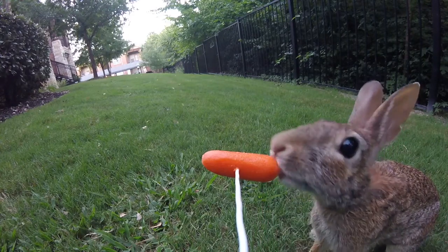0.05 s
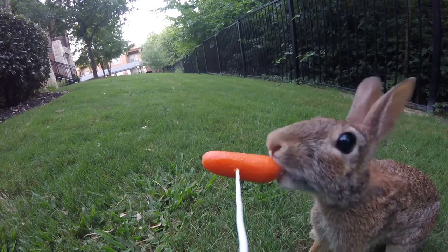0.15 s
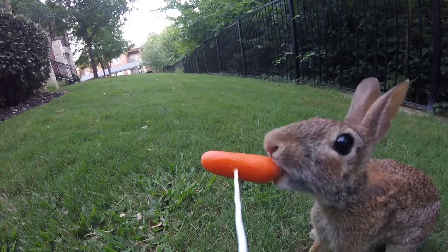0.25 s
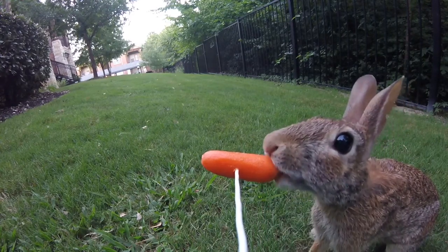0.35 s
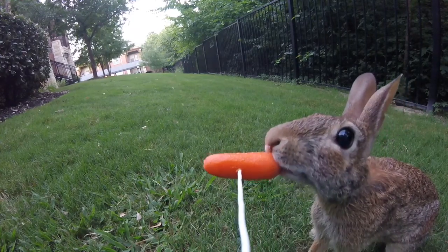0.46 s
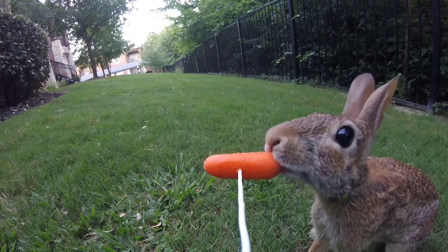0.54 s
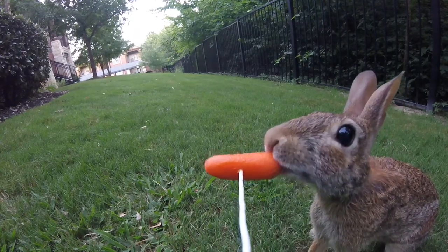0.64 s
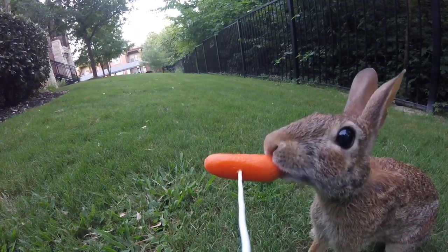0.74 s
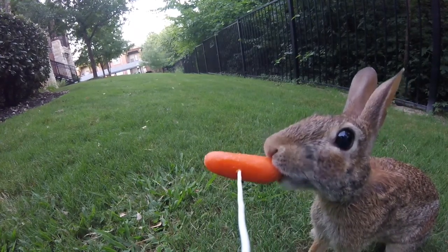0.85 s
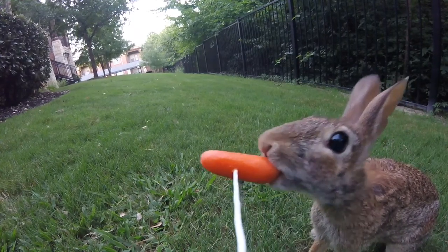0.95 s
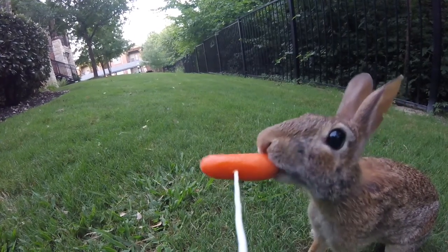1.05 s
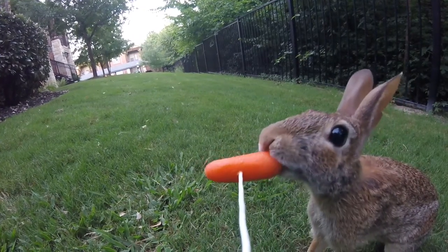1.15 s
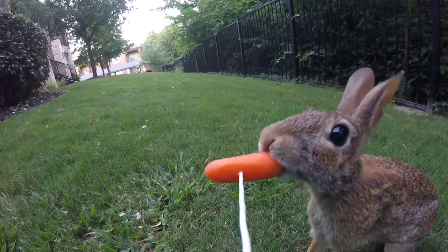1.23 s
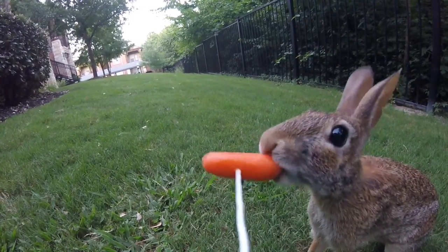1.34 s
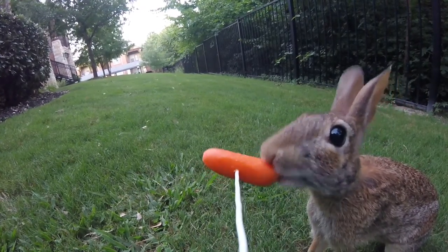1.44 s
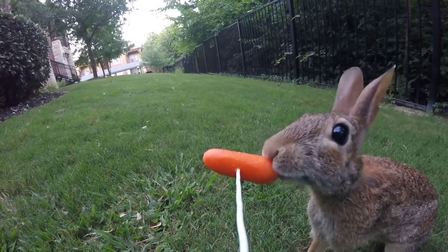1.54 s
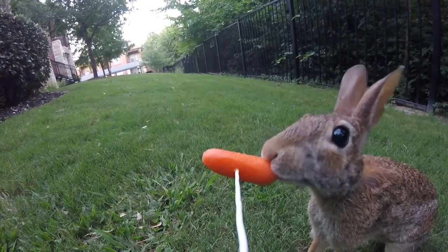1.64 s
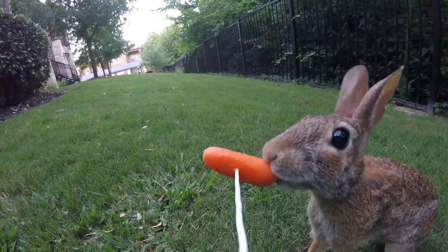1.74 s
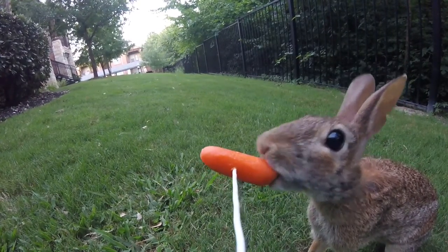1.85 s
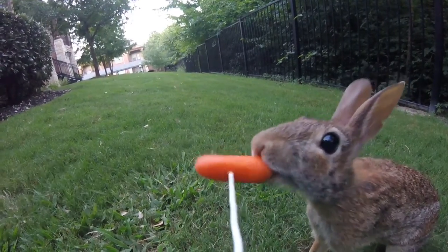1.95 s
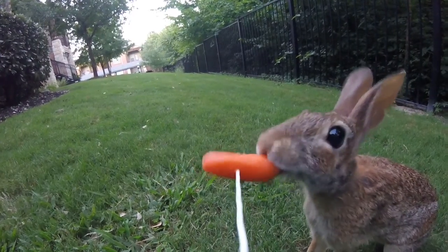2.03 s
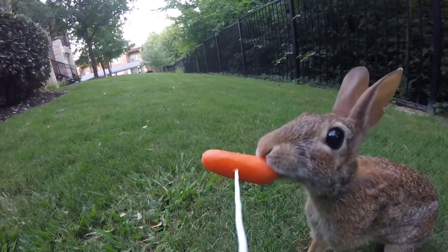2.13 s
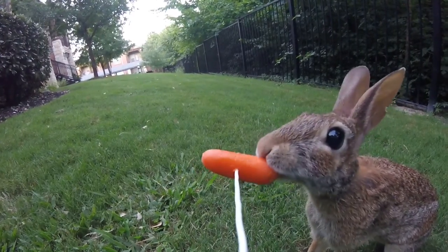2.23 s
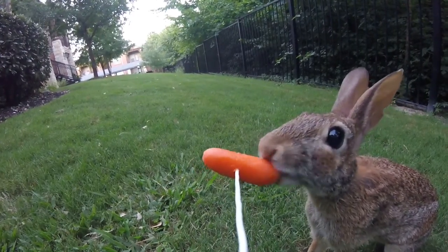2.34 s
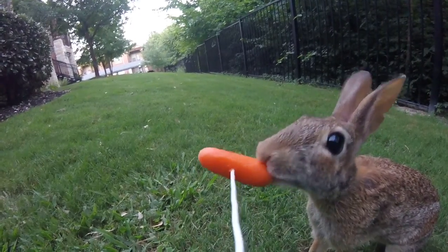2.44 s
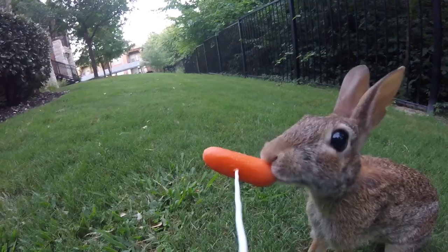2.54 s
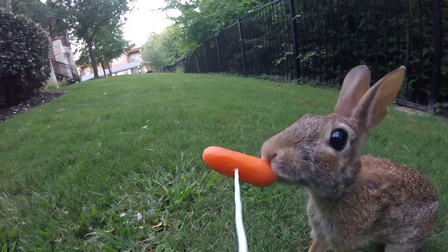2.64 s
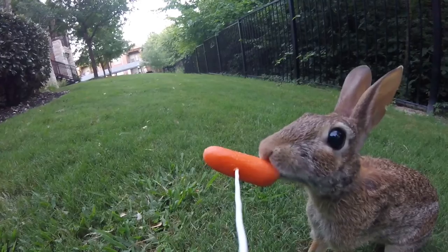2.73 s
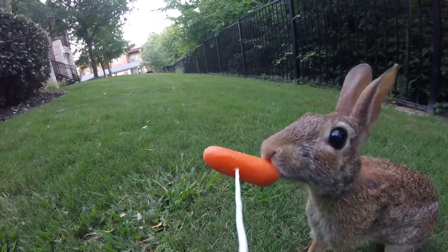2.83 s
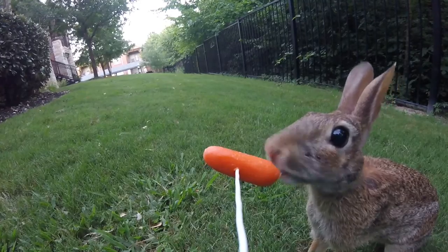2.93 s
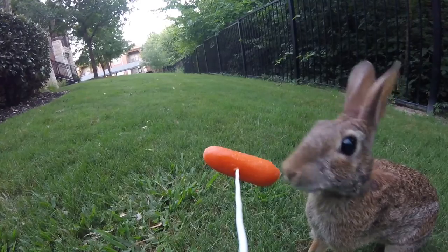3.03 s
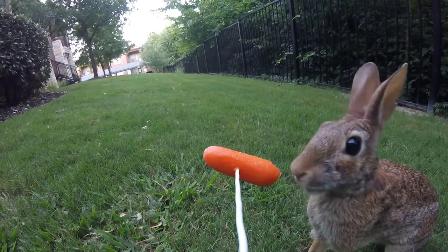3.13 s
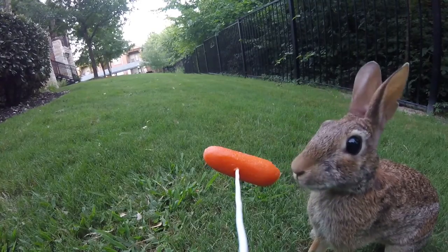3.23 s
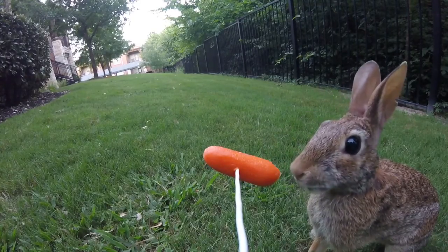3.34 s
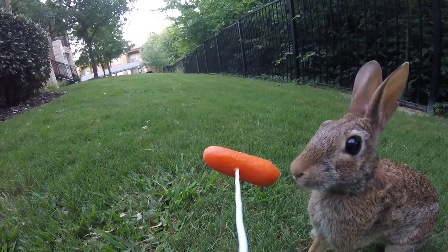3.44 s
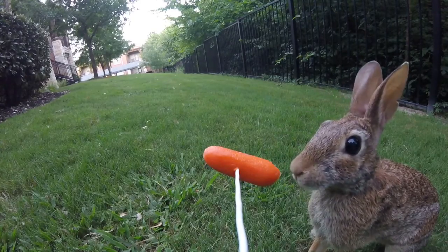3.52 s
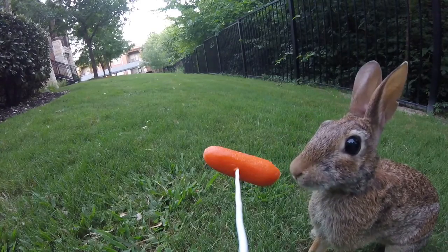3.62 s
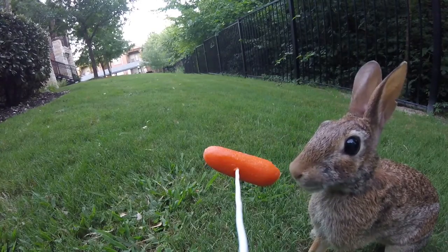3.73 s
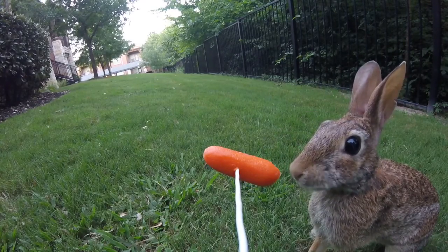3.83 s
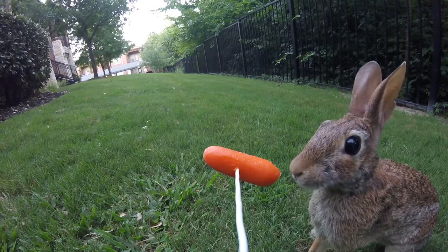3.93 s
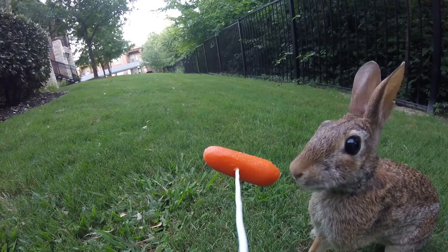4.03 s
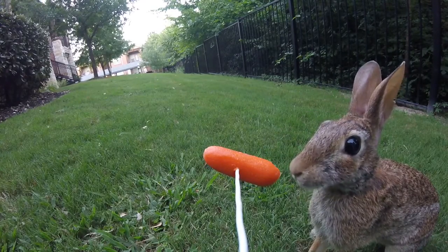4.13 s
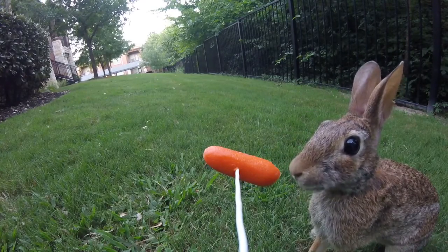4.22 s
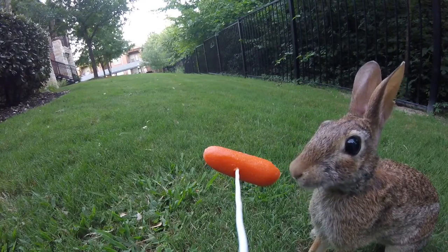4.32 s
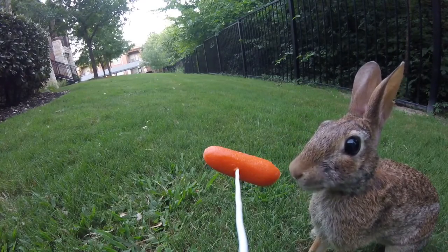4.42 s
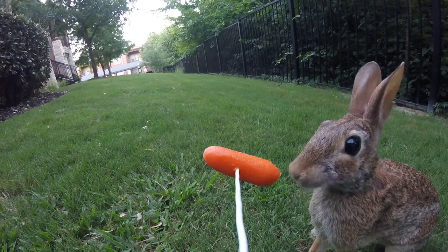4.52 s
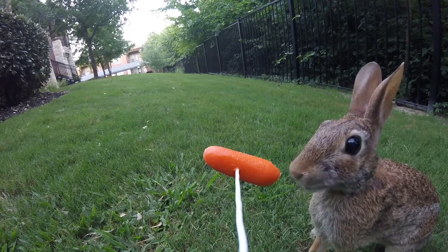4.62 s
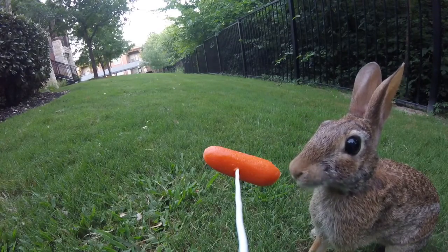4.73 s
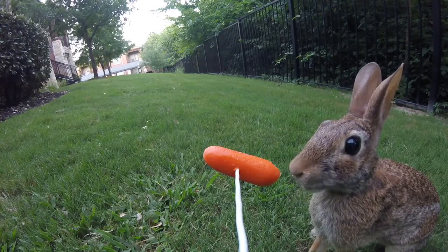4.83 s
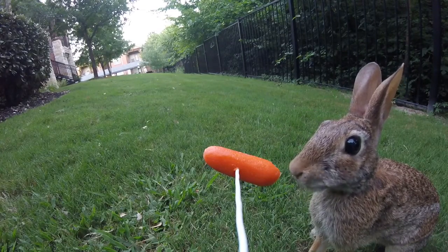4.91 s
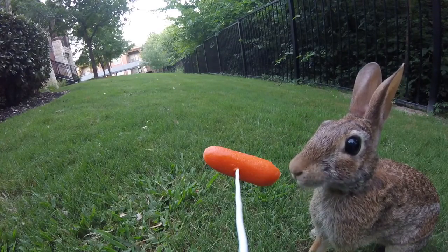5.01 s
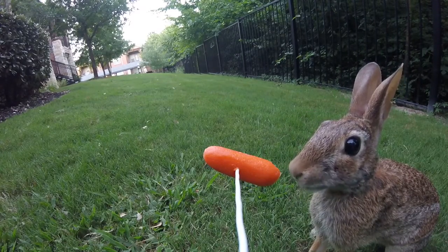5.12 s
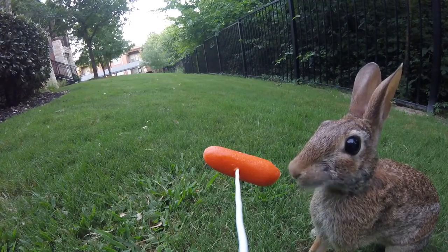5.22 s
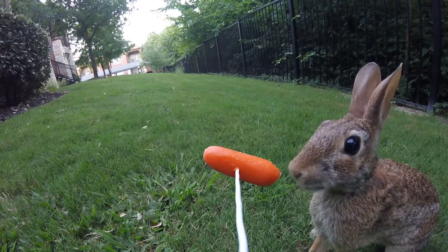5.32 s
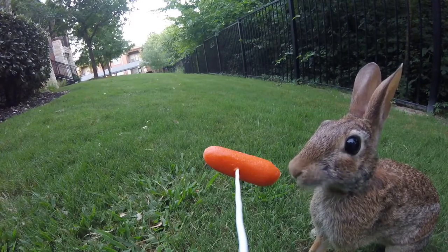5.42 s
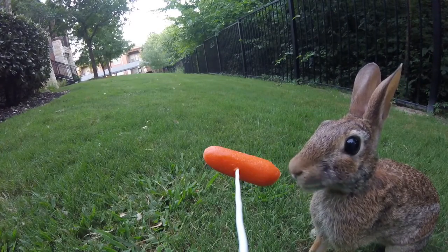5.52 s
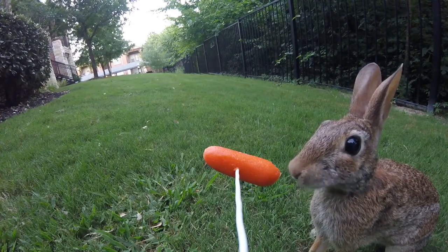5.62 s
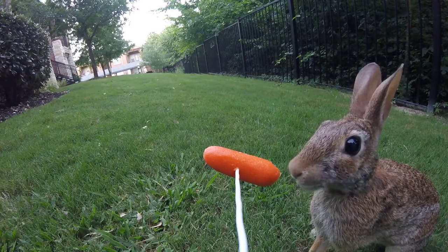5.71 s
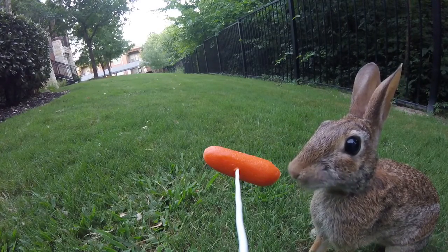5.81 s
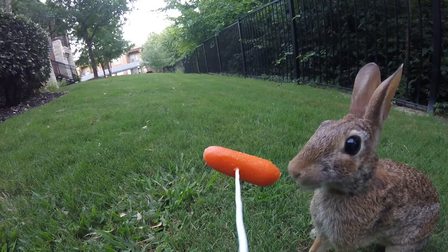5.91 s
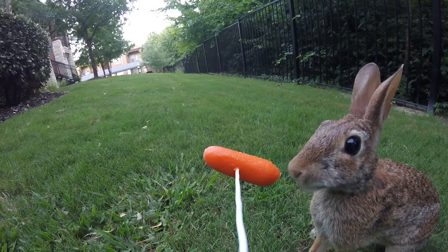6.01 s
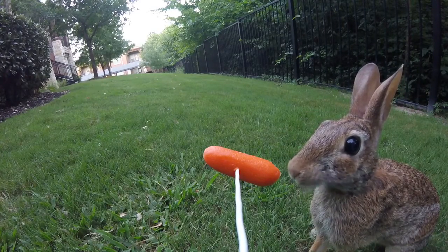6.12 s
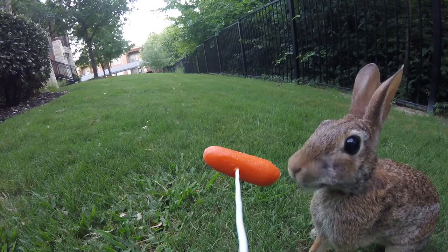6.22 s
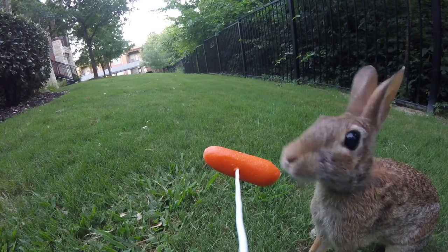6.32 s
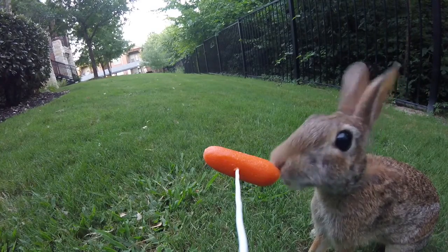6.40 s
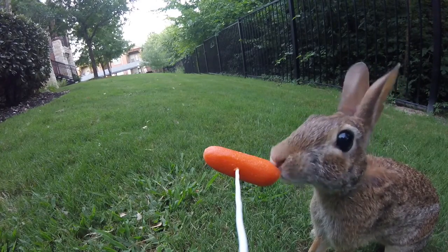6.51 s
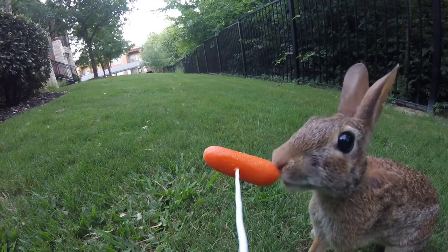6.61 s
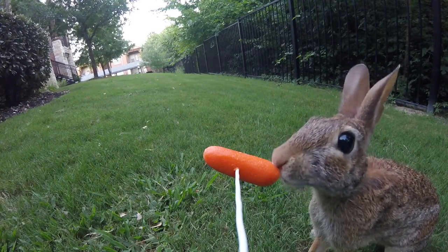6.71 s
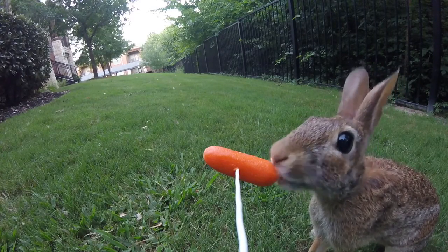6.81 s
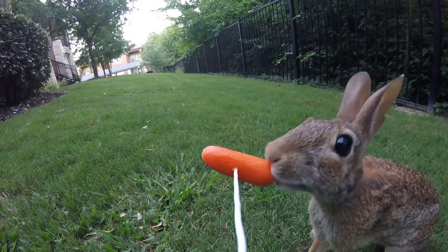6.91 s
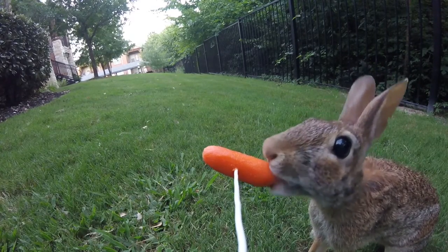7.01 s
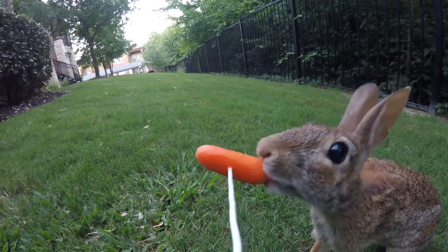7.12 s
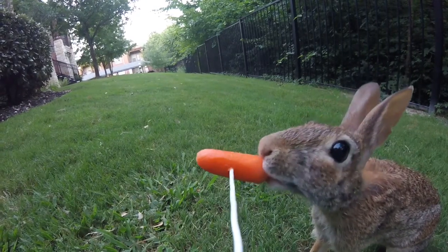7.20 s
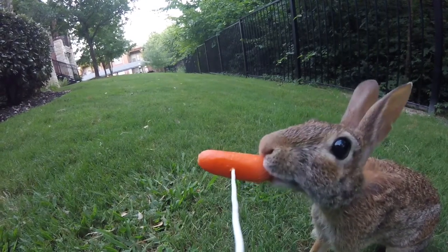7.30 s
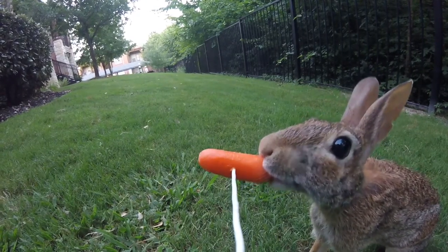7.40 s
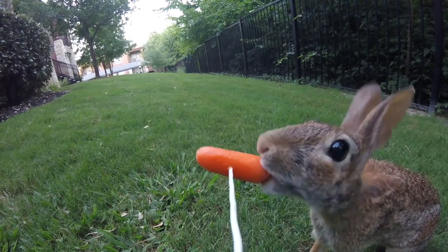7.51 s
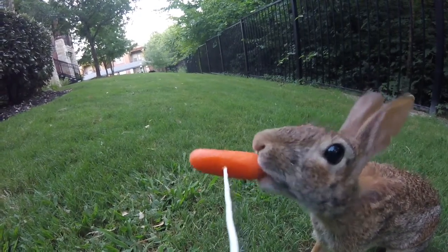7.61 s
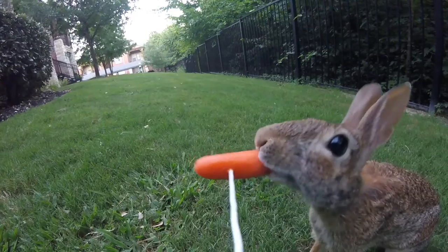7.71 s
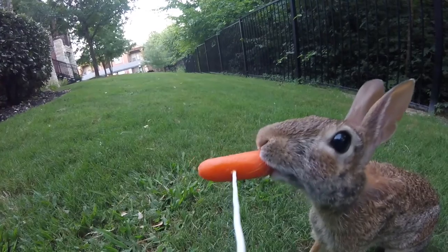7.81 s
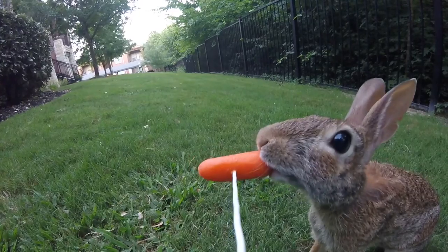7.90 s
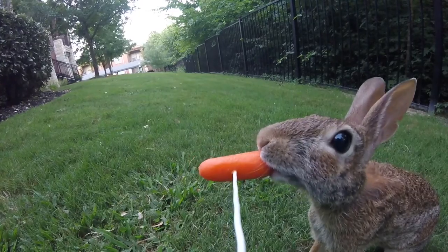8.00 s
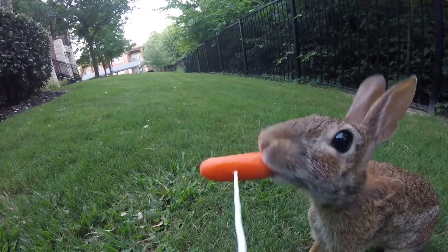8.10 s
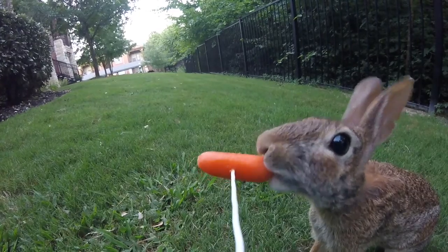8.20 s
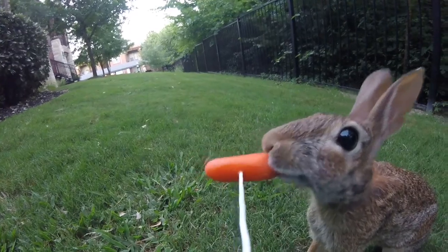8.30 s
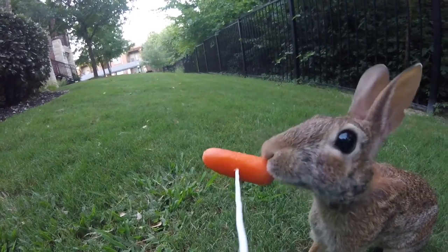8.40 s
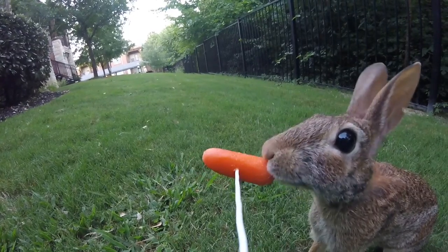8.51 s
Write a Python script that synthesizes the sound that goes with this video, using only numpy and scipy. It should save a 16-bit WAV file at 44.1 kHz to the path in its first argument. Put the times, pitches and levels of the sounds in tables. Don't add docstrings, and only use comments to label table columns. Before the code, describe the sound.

A rabbit crunches a carrot very close in two bouts of hard, woody cracks, with cicadas, a distant bird and a low hum behind.

```python
import sys
import numpy as np
from scipy import signal
from scipy.fft import rfft, irfft, next_fast_len
from scipy.io import wavfile
from scipy.ndimage import uniform_filter1d, minimum_filter1d, map_coordinates

SR = 44100
rng = np.random.default_rng(int(sys.argv[2]) if len(sys.argv) > 2 else 0)


def undo_db(level):
    steps = np.asarray(level, float) / 20
    return 10 ** steps


def file_out(sig):
    cols = np.atleast_2d(sig).T
    lim = np.clip(cols, -1, 1)
    pcm = np.round(lim * 32767).astype(np.int16)
    wavfile.write(sys.argv[1], SR, pcm)


N = 377055
SECONDS = np.arange(N) / SR

# (frequency [Hz], density [dB])
TOWN_COLOUR = [(88, -4.5), (150, -10), (243, -5), (304, -8.5), (354, -7), (609, -17.5), (827, -16),
               (1320, -21), (1520, -21), (2250, -22.5), (2500, -19), (3250, -26), (5500, -120)]
# (multiple of the blade rate, level [dB])
FAN_LINES = [(1, -47), (2, -57.5), (3, -55.5), (4, -60.5), (5, -59), (6, -69)]
# (frequency [Hz], level [dB])
COMPRESSOR_LINES = [(59, -55), (240, -65), (410, -63), (540, -70.5), (760, -78.5), (830, -68), (900, -73.5),
                    (1400, -77)]

# (frequency [Hz], gain [dB])
HEDGE = [(1500, -3), (2000, -2), (2400, -10), (2750, -2), (3600, 0)]
# (time [s], pitch [Hz], level [dB])
RISE = [(0, 1600, -18), (.06, 1850, -8), (.095, 2050, -4), (.12, 2900, -2), (.155, 3400, 0),
        (.165, 3480, -14)]
# (time [s], level [dB])
RISES_AT = [
    (5.485, -55.5),
    (5.885, -55),
    (6.28, -54.5),
]
# (time [s], length [s], from [Hz], to [Hz], level [dB])
FALLS = [
    (4.53, .1, 2200, 1860, -61),
    (4.92, .1, 3450, 3030, -63),
    (5.11, .07, 2150, 1860, -63),
]

# (frequency [Hz], density [dB])
NEAR_COLOUR = [(1000, -49), (1700, -16), (2270, -1), (2520, -7), (2760, -3), (3200, -4), (3610, 2),
               (4730, -26.5), (6410, -5), (6890, -9), (7530, -18), (9770, -29), (11300, -34), (13600, -40),
               (14500, -48)]
CHORUS_COLOUR = [(880, -4.5), (1500, -7.5), (1920, -27), (2270, -3.5), (2530, -23), (2880, 1), (3610, 8),
                 (4650, -2.5), (5190, 1), (5830, 0), (6550, 4.5), (7090, -32), (8500, -36), (11000, -29),
                 (18700, -120)]
SHRILL_COLOUR = [(4120, -55), (7000, -1), (7740, -3), (9440, -8), (10200, -11), (11100, -7.5),
                 (11500, -9.5), (11800, -14), (13200, -13), (13900, -26), (14500, -37)]
# (time [s], level [dB])
CHORUS_LEVEL = [(0, -48), (.97, -48), (1.33, -50.5), (2.83, -51.5), (3.55, -50.5), (4.9, -51), (5.43, -54),
                (6.0, -57.5), (6.64, -56), (7.48, -52), (7.88, -56), (8.55, -53.5)]
SHRILL_LEVEL = [(0, -61.5), (2, -65.5), (4.4, -61), (5.5, -63.5), (6.64, -64), (7.1, -58.5), (7.88, -60.5),
                (8.55, -61)]
# (from [s], to [s], level [dB], throb rate [1/s])
PHRASES = [
    (0, .5, -59.5, 17),
    (3.105, 5.08, -52, 19.2),
    (5.12, 6.786, -61.5, 26.5),
    (7.088, 7.567, -54, 28),
    (7.798, 8.549, -57, 27),
]

# (frequency [Hz], density [dB])
RUMBLE_COLOUR = [(13, -58), (22, -5), (46, -6.5), (92, -4.5), (108, -6.5), (189, -12), (209, -15),
                 (232, -10), (260, -14.5), (340, -29), (570, -120)]
# (time [s], level [dB])
BREEZE = [(0, -53), (2.74, -38.5), (4.64, -42), (5.55, -39.5), (6.62, -53), (8.55, -57)]
TRAFFIC = [(0, -41.5), (2.4, -48.5), (4.64, -45), (7.5, -46), (8, -58), (8.55, -52)]
# (from [s], to [s], level [dB])
ENGINE = [(3.1, 5.4, -49)]
# (time [s], swing [dB], rattle [dB], build-up [s])
TUGS = [(.14, -36, -37, 0.065), (.55, -27, -31.5, 0.049), (1.05, -32.5, -41, 0.38),
        (1.55, -31, -37.5, 0.27), (1.93, -28, -28, 0.033), (2.09, -27, -44, 0.28),
        (2.45, -28.5, -36.5, 0.044), (7.3, -31.5, -40, 0.25), (7.95, -50, -50.5, .3),
        (8.38, -25, -33.5, 0.099)]

# (frequency [Hz], width [Hz], level [dB])
LOW_MODES = [(287, 68.5, 12), (414, 45, 12), (503, 54, 14.5)]
MID_MODES = [(695, 49, 10.1), (851, 86, 13.5)]
UPPER_MODES = [(1202, 280, 6.6), (1324, 173, 10.8), (1498, 392, 2.7)]
BITE_MODES = [(1298, 210, 12), (1560, 260, 5)]
NECK_MODES = [(2260, 56, 16.4), (2490, 610, 7.3)]
HIGH_MODES = [(3380, 225, 13.1), (4000, 150, 12.4), (4110, 1100, 3.2)]
TOP_MODES = [(4860, 75, 5), (6365, 216, 14), (7600, 220, -12), (8370, 210, -5.5), (10800, 1600, -6)]

# (full pressure from [s], to [s], scrape [dB], dull part over it [dB])
STROKES = [(0.306, 0.3, -53, 21), (0.327, 0.4, -38.5, 5.5), (0.392, 0.48, -37, 7.5),
           (0.575, 0.54, -36.5, 18.5), (0.98, 1.03, -54, 18.5), (1.015, 1.11, -35, -1.5),
           (1.38, 1.382, -61, 22.5), (1.483, 1.52, -43, 11), (1.91, 1.77, -44, 10),
           (1.939, 1.928, -25, 5.5), (2, 2.025, -30, 9), (2.058, 2.013, -39, 13), (2.433, 2.48, -34, 4),
           (2.5, 2.56, -53.5, 11.5), (6.915, 6.95, -46.5, 9), (7.076, 7.9, -50, 6),
           (7.127, 7.17, -26.5, 4.5), (7.19, 7.23, -41, -1), (7.246, 7.18, -38.5, 11.5),
           (7.61, 7.7, -40.5, 9), (7.627, 7.6, -36.5, -1), (7.69, 7.66, -29, 8.5), (7.752, 7.43, -46, 6),
           (8.264, 8.32, -38, 6), (8.31, 8.04, -37, -2), (8.35, 7.85, -44, 10)]
# (time [s], peak [dB], thud [dB], bite [dB], edge [dB])
SNAPS = [(0.395, -15.5, 5, 1.5, -4), (0.517, -29, -4, -14, 2), (0.5385, -9.5, -10, 2.5, -7),
         (0.5435, -13.5, 2.5, 1, -9), (1.14, -8, -3.5, 6, -10.5), (1.1995, -16.5, -4.5, 5, -1.5),
         (1.6308, -7, 0, 3, -14), (1.912, -18, 2.5, 1, -16), (1.928, -14.5, 6.5, 1.5, -8),
         (1.984, -12, -1, 8, -5), (2.01, -10, -3, -20, -16.5), (2.053, -18, -5, 1.5, -3),
         (6.906, -28.5, -3.5, 1.5, -12), (7.162, -26, 1, 10, -2), (7.224, -26, -23, 5, -5),
         (7.275, -17.5, 0.5, -1.5, -8), (7.62, -22.5, 6, 11.5, -4), (7.675, -5, -2, 0.5, -16.5),
         (7.726, -17, -12, -9, -20), (7.756, -19.5, -6.5, -5, -19), (8.0955, -26, 7.5, 7.5, -12),
         (8.259, -21.5, -5, -7, -15), (8.277, -16, -7, 1.5, -21), (8.3545, -9, 1.5, 0.5, -6),
         (0.146, -47, -15, 0, 11), (0.066, -53, -15, 2, 6), (2.4865, -27, -1, 1.5, -7.5)]
# (sway mode [dB], second mode [dB], fourth mode [dB], neck [dB],
# damping [factor])
GRIPS = [(-1.5, -8, -9, -1, 0.92), (3, 0, 0, 0, 0.88), (-15, 0, -15, 5, 1.1), (4.5, 1.5, -13, 15.5, 0.71),
         (-10, 3.5, -4, 5, 1.03), (-4.5, 2.5, -9, 0, 1), (-15, -11, -5, -5, 0.71), (-4, -3, 6, -3, 1.6),
         (-2, -1, 7, 5, 1.45), (2.5, 4, 4, -6, 1.4), (-5, 5, 3, 0, 1.5), (6, -1, 2, 4, 0.88),
         (4.5, -3, 5, 5, 1.2), (0, 0, 0, 0, 1.1), (0, 0, -2, 0, 1.1), (-2, 1.5, -3, 0, 0.91),
         (0, 2.5, -4, -5, 1.04), (-20, -3, 4, 3, 1.3), (-11, 0, -2, -2, 0.99), (-8, 3, -6, -3, 1.1),
         (-0.5, 4.5, -10, 9.5, 0.94), (-7, -2, -7, 0, 1.1), (-2, 0, 0, 0, 1.06), (0, -4, -3, -9, 1.07),
         (0, 0, 0, 17, 1.1), (0, 0, 0, 15, 1.1), (0, 2, 0, 10, 0.89)]
# (bite [Hz], neck [Hz], edge [Hz], thud delay [ms])
PULLS = [(1320, 1900, 3600, 0.66), (1300, 2200, 3200, 1), (1340, 2430, 3400, 1.2), (1170, 2050, 3300, 1.26),
         (1233, 2140, 3600, 2.65), (1306, 2280, 3350, 1.8), (1190, 2520, 3500, .7), (1200, 2700, 3400, .3),
         (1320, 2000, 3330, 0.27), (1260, 2360, 3730, 1), (1200, 2200, 3400, 0.95), (1270, 2800, 3340, 0.6),
         (1390, 2200, 3300, .9), (1550, 2200, 3600, 1), (1607, 2300, 3000, .9), (1590, 2200, 3230, 0.86),
         (1560, 2300, 3473, .9), (1415, 2200, 3700, 0.77), (1410, 2200, 3300, 0.89),
         (1400, 2000, 3100, 0.95), (1380, 2700, 3500, 0.58), (1389, 2200, 3300, 0.71),
         (1290, 2200, 3700, 0.67), (1360, 1800, 3370, 0.86), (1300, 2200, 3900, .9), (1300, 2800, 3500, .9),
         (1400, 2100, 3300, 0.71)]
# (time [s], peak [dB], brightness [dB])
NIBBLES = [(0.226, -36.5, 2), (0.291, -37, -26), (0.323, -32, -3), (0.337, -34, 7.5), (0.352, -25.5, 0),
           (0.36, -39, 8), (0.408, -23, 3), (0.431, -30, -14), (0.441, -24.5, -2), (0.458, -29, -6),
           (0.488, -25.5, -1), (0.599, -41, -9), (0.983, -42, -26), (1.002, -35, 4.5), (1.059, -35, 4),
           (1.099, -25, -2), (1.107, -33.5, 11), (1.1454, -22, -17), (1.375, -39, -2), (1.444, -39.5, -3),
           (1.478, -36, -3), (1.5, -39, -12), (1.949, -16.5, -5), (2.023, -25, 2), (2.067, -23.5, -14),
           (2.417, -45, -10), (2.439, -35, 9.5), (2.456, -36, -8), (2.462, -34, 0), (2.446, -40, 8),
           (2.425, -44, 2), (0.306, -47, 5), (0.602, -42, 1), (0.718, -46, 0), (1.016, -40, 1),
           (1.035, -38, 5), (1.075, -40, 6), (1.117, -38, 3), (1.49, -36, 3), (1.52, -45, -4),
           (1.559, -39, -8), (1.958, -25, 3), (2.001, -32, 1), (2.026, -27, 3)]
NIBBLES_AGAIN = [(7.075, -45, 2), (7.112, -38, 5), (7.126, -32, 5), (7.136, -24, -8), (7.149, -24, -20),
                 (7.204, -36, 1), (7.232, -28.5, 4), (7.25, -23, -13), (7.263, -31, 2), (7.303, -50, 9),
                 (7.591, -23, -10), (7.597, -26, -13), (7.651, -35, -4), (7.694, -20, 2), (7.705, -36, 13),
                 (7.712, -25.5, 2), (7.768, -43, 8), (8.18, -41, -15), (8.297, -18.5, -17),
                 (8.329, -20.5, -4), (8.381, -22, -18), (6.952, -50, 4), (6.987, -47, 5), (7.117, -36, 6),
                 (7.146, -30, 1), (7.381, -47, 1), (7.635, -28, -6), (7.688, -31, 7), (8.253, -34, 1),
                 (8.311, -33, -3)]
NIBBLE_EDGES = [-2, 0, 0, 4, 2, 5, 3, 0, -2, 5, 4, 0, 0, 2, -3, -3, -4, 0, 0, 0, 0, 0, -4, -4, 0, 0, -2, 0,
                0, 3, 0, 3, 0, 0, 0, 4, 0, 0, 0, 0, 0, -6, -3, -2, 0, 0, -3, 2, 0, 0, 0, 0, 0, 0, -5, -3, 0,
                -4, 2, -1, -3, 0, 0, -3, -3, 0, 0, -3, 0, 0, 0, 0, -3, 0]

# (frequency [Hz], threshold over usual size [factor])
TREBLE_GATE = [(7000, 0), (8300, .6), (10000, 1.45), (11200, 1.05), (12500, 1.3), (13600, 1.55),
               (14500, 2.4)]


def unit(x):
    return x / np.sqrt(np.mean(x ** 2) + 1e-20)


def along(points, hz):
    f, v = np.transpose(points)
    return np.interp(np.log(hz + 1), np.log(f + 1), v)


def curve(rows):
    s, db = np.transpose(rows)
    return np.interp(SECONDS, s, db)


def held(starts, ends, levels_db, rise, fall):
    t = np.arange(0, N + 32, 32)[:, None] / SR
    before = rise * np.clip(starts - t, 0, None)
    after = fall * np.clip(t - ends, 0, None)
    return np.interp(SECONDS, t[:, 0], (levels_db - before - after).max(axis=1))


def wobble(rate):
    coarse = np.arange(0, N + 32, 32)
    knots = rng.standard_normal(int(N * rate / SR) + 4)
    return np.interp(np.arange(N), coarse, map_coordinates(knots, [coarse * rate / SR]))


def noise():
    return rng.standard_normal(N)


def tone(hz):
    return np.sin(2 * np.pi * np.cumsum(hz) / SR)


def filtered(x, response):
    m = next_fast_len(N + SR // 2)
    return irfft(rfft(x, m) * response(np.fft.rfftfreq(m, 1 / SR)), m)[:N]


def coloured(x, spectrum):
    return unit(filtered(x, lambda hz: undo_db(along(spectrum, hz))))


def ringing(f, modes, turn, pull=1, damping=1, extra_db=(0, 0, 0, 0, 0)):
    total = 0
    for k, (centre, width, db) in enumerate(modes):
        gain = turn ** k * undo_db(db + extra_db[k])
        total = total + gain * 1j * f * width / ((pull * centre) ** 2 - f * f + 1j * f * width * damping)
    return total / (1 + 1j * f / (1.6 * pull * modes[-1][0])) ** 2


def rung(x, modes):
    return unit(filtered(x, lambda f: ringing(f, modes, -1)))


def cooler(fan_hz=37.3, compressor_hz=59.17):
    hum = 0
    for k, db in FAN_LINES:
        level = undo_db(db + 2.9 * wobble(4.8))
        hum = hum + level * np.sin(2 * np.pi * k * fan_hz * SECONDS + 0.51 * wobble(2.474))
    for hz in compressor_hz * np.arange(1, 25):
        level = undo_db(along(COMPRESSOR_LINES, hz) + 1.84 * wobble(2.014))
        hum = hum + level * np.sin(2 * np.pi * hz * SECONDS + 6 * rng.random())
    town = undo_db(-51 + 0.056 * wobble(2.3)) * coloured(noise(), TOWN_COLOUR)
    return np.sqrt(2) * hum + town


def bird():
    whistles = [[(s + later, hz, db + shape) for later, hz, shape in RISE] for s, db in RISES_AT]
    for s, long, top, end, db in FALLS:
        bend = (s + .3 * long, .45 * top + .55 * end, db)
        whistles.append([(s, top, db - 8), bend, (s + .8 * long, end, db - 2), (s + long, end, db - 9)])
    song = np.zeros(N)
    for rows in whistles:
        s, hz, db = np.transpose(rows)
        at = np.arange(int(s[0] * SR) - 300, int(s[-1] * SR) + 300)
        level_db = uniform_filter1d(np.interp(at / SR, s, db, -140, -140), size=200) + 9
        song[at] += undo_db(level_db) * tone(np.interp(at / SR, s, hz))
    song = undo_db(2.2 * wobble(70) - 3.5) * filtered(song, lambda hz: undo_db(along(HEDGE, hz)))
    t = np.arange(SR // 2) / SR
    tail = rng.standard_normal(len(t)) * undo_db(-60 * t / .4) * (t > .015)
    return .95 * song + .8 * signal.fftconvolve(song, tail / np.linalg.norm(tail))[:N]


def cicadas(click_hz=180.8):
    start, end, song_db, throbs = np.transpose(PHRASES)
    throb_hz = throbs[np.searchsorted(end[:-1], SECONDS)]
    throb_hz = throb_hz + 6.17 * np.exp(-np.abs(SECONDS - start[1]) / 0.3524)
    sway = np.sin(2 * np.pi * np.cumsum(throb_hz) / SR + .3 * wobble(8))
    throb = undo_db((7 + .8 * wobble(6)) * sway)
    turns = click_hz * SECONDS + .03 * wobble(30)
    clicks = np.diff(np.floor(turns), prepend=0) * undo_db(2.7 * noise())
    rasp = undo_db(np.cos(2 * np.pi * turns)) * noise()
    t = np.arange(SR // 4) / SR
    echoes = rng.standard_normal(len(t)) * (undo_db(-60 * t / .016) + .1 * undo_db(-60 * t / .25))
    near = unit(signal.fftconvolve(throb * clicks, echoes)[:N]) + .6 * unit(throb * rasp)
    near_db = held(start, end, song_db, 45, 200)
    chorus = coloured(undo_db(0.72 * wobble(25)) * noise(), CHORUS_COLOUR)
    shrill = coloured(undo_db(0.95 * wobble(23)) * noise(), SHRILL_COLOUR)
    far = undo_db(curve(CHORUS_LEVEL) - 0.5) * chorus + undo_db(curve(SHRILL_LEVEL)) * shrill
    return undo_db(near_db) * coloured(near, NEAR_COLOUR) + far


def engine():
    level_db = held(*np.transpose(ENGINE), 30, 8.4) + 2 + 1.9 * wobble(5.9)
    return undo_db(level_db) * tone(64 + 5.36 * wobble(1.5))


def mount(build_db=8.5):
    s, tug_db, rattle_db, build_s = np.transpose(TUGS)
    rise = build_db / build_s
    swing_db = np.maximum(held(s, s, tug_db, rise, 88), curve(BREEZE))
    rumble_db = np.maximum(held(s, s, rattle_db, rise, 169), curve(TRAFFIC))
    swing = tone(41 + 3.575 * wobble(7.6))
    return undo_db(swing_db) * swing + undo_db(rumble_db + 2) * coloured(noise(), RUMBLE_COLOUR)


def gnawing(breaks_per_s=1900):
    start, end, scrape_db, dull_db = np.transpose(STROKES)
    press, let_go = 600, 420
    scrape = held(start, end, scrape_db, press, let_go)
    dull = held(start, end, scrape_db + dull_db, press, let_go)

    def breaks():
        return (rng.random(N) < breaks_per_s / SR) * noise() * undo_db(3 * wobble(90))

    bright = rung(breaks(), MID_MODES) + undo_db(3) * rung(breaks(), UPPER_MODES)
    bright += undo_db(-10) * rung(breaks(), NECK_MODES + HIGH_MODES)
    return undo_db(dull - 2.5) * rung(breaks(), LOW_MODES) + undo_db(scrape - 10.5) * bright


def crack_table():
    s, db, bright = np.transpose(NIBBLES + NIBBLES_AGAIN)
    edge_db = -7.5 + 0.65 * bright + NIBBLE_EDGES
    table = np.vstack([SNAPS, np.transpose([s, db, -1.5 - 0.1 * bright, bright, edge_db])])
    top_db = table[:, 4] - 14 + .45 * (table[:, 1] + 11)
    return np.column_stack([table, top_db])


def teeth():
    count = len(NIBBLES + NIBBLES_AGAIN)
    chance = rng.standard_normal((count, 7))
    loose = np.ones(count)
    small_grips = np.column_stack([4 * chance[:, :4], 1.33 * loose])
    small_hz = [1380, 2210, 3500] * (1 + .06 * chance[:, 4:])
    small_pulls = np.column_stack([small_hz, 0.62 * loose])
    return np.vstack([GRIPS, small_grips]).T[..., None], np.vstack([PULLS, small_pulls]).T[..., None]


def cracks(tearing_s=0.0022):
    table = crack_table()
    count, span, lead = len(table), 4096, 64
    start_s, peak_db, thud_db, bite_db, edge_db, top_db = table.T[..., None]
    (sway_db, second_db, fourth_db, neck_db, damping), (bite_hz, neck_hz, edge_hz, later_ms) = teeth()
    damping = np.clip(damping, .3, 4)
    f = np.fft.rfftfreq(span, 1 / SR)

    low = ringing(f, LOW_MODES, 1, 0.95, damping, (sway_db, second_db, 0))
    mid = ringing(f, MID_MODES, 1, 0.97, damping, (fourth_db, 0))
    dull = f / (1.35 * bite_hz)
    bite = ringing(f, BITE_MODES, -0.82, bite_hz / BITE_MODES[0][0]) / (1 + 1j * dull - dull ** 2)
    neck = ringing(f, NECK_MODES, -0.8, neck_hz / NECK_MODES[0][0], 3.6)
    edge = ringing(f, HIGH_MODES, -1.01, edge_hz / HIGH_MODES[0][0])
    top = ringing(f, TOP_MODES, -0.98)
    # (response, level over peak [dB], stretch of the volley, delay [s])
    groups = [(low, thud_db + 28, 1.4, later_ms / 1e3),
              (mid, 26, .9, later_ms / 2020),
              (bite, bite_db + 19, .7, 2e-4),
              (neck, 0.49 * bite_db + .5 * edge_db + neck_db + 13.5, .9, 0),
              (edge, edge_db + 17, .8, 0),
              (top, top_db + 22, .4, -2e-4)]

    rows, spectrum = np.arange(count)[:, None], 0
    for k, (response, extra_db, stretch, delay_s) in enumerate(groups):
        late = np.abs(rng.standard_normal((count, 5))) * stretch * tearing_s
        size = (.2 if k < 2 else .35) * np.tanh(2 * rng.standard_normal((count, 5)))
        late[:, 0], size[:, 0] = 0, -1
        size *= undo_db(peak_db + extra_db) / np.linalg.norm(size, axis=1, keepdims=True)
        onset = np.round((delay_s + late) * SR).astype(int) + lead
        at = span * rows + np.clip(onset, 0, 2048)
        volley = np.bincount(at.ravel(), size.ravel(), span * count).reshape(-1, span)
        spectrum = spectrum + rfft(volley) * response
    at = np.round(start_s * SR).astype(int) - lead + np.arange(span)
    return np.bincount(at.ravel(), irfft(spectrum).ravel(), N)[:N]


def scene():
    return (cooler() + bird() + cicadas() + engine() + mount() + gnawing() + cracks())[None]


def gated(x):
    hz, _, z = signal.stft(x, SR, "cosine", nperseg=2048)
    size = np.abs(z)
    loud = np.sqrt(np.sum(size ** 2, axis=0))
    raised = (loud / np.median(loud)) ** .1
    usual = minimum_filter1d(uniform_filter1d(size, size=41, axis=0), size=5, axis=1)
    usual = uniform_filter1d(usual, size=9, axis=1)
    keep = size > 1.15 * along(TREBLE_GATE, hz)[:, None] * usual * raised
    return signal.istft(z * keep, SR, "cosine", nperseg=2048)[1][:N]


def roll_off(x):
    return signal.sosfilt(signal.butter(12, 14680, fs=SR, output="sos"), x)


def record(dry):
    limited = filtered(dry[0], lambda hz: hz < 14600)
    mix = gated(limited)[None]
    return roll_off(mix)


dry = scene()
out = record(dry)
file_out(out)
```